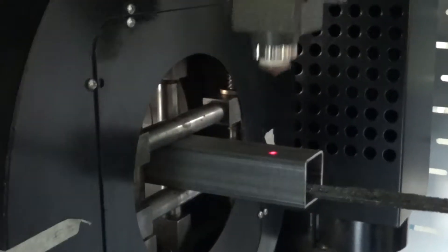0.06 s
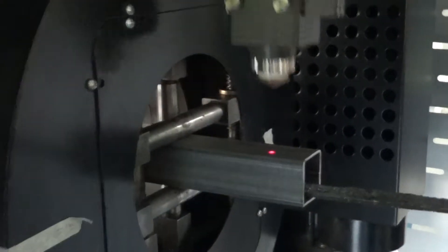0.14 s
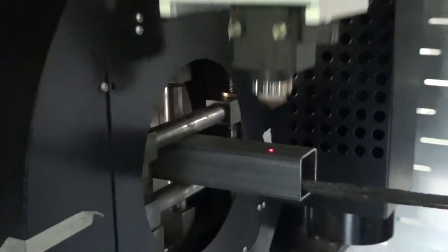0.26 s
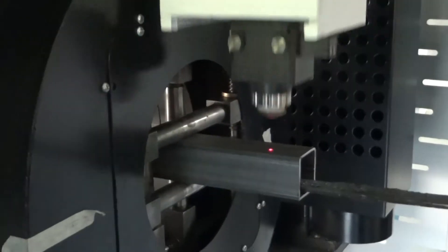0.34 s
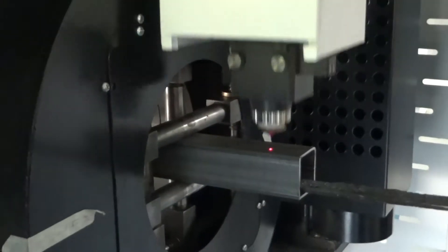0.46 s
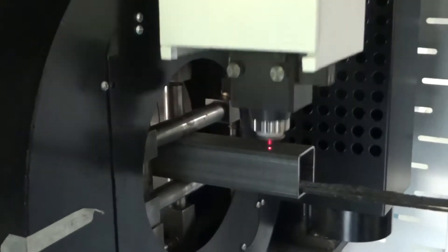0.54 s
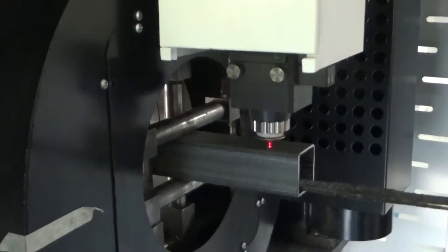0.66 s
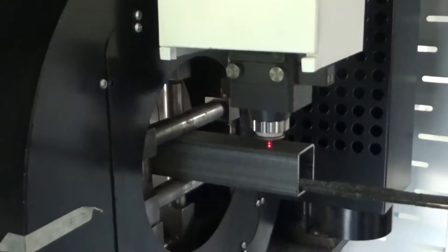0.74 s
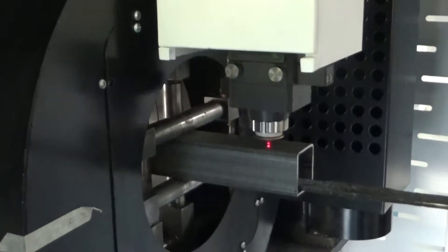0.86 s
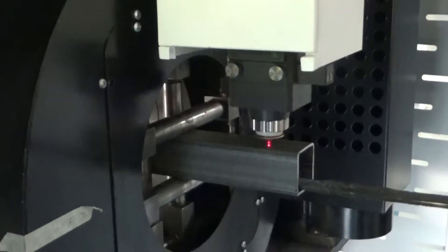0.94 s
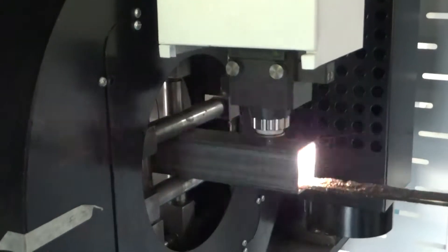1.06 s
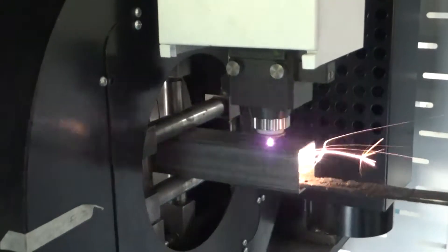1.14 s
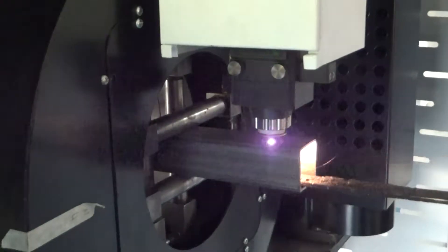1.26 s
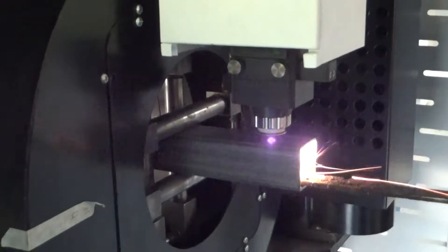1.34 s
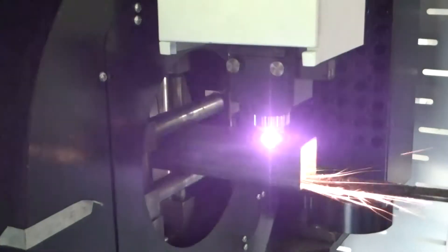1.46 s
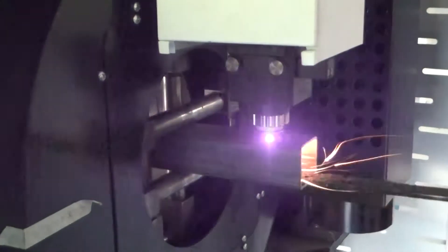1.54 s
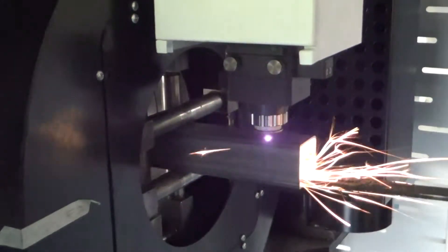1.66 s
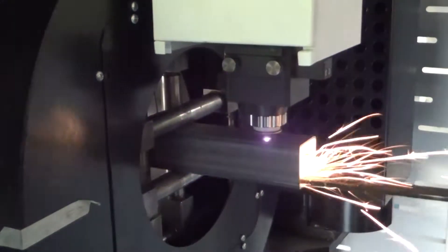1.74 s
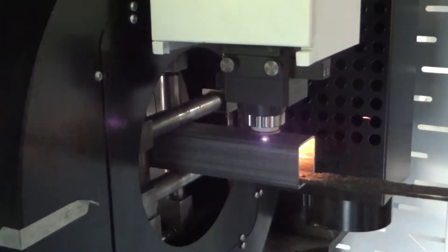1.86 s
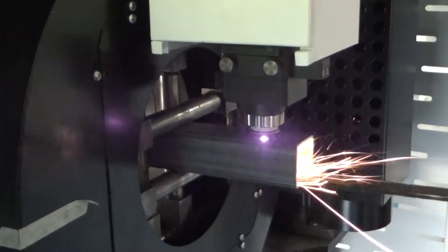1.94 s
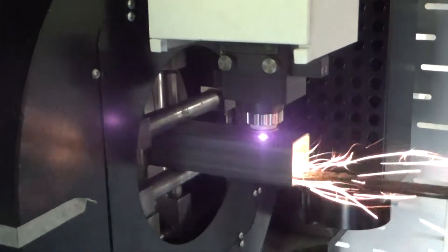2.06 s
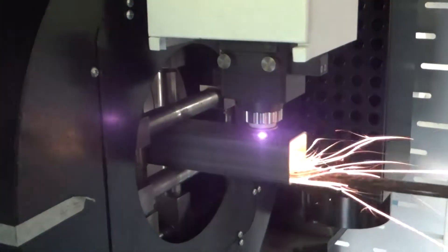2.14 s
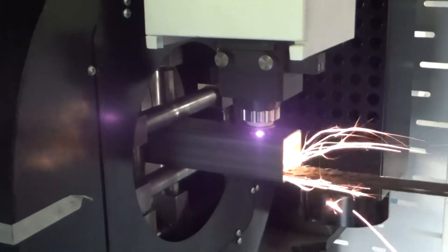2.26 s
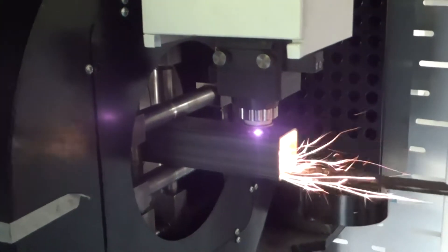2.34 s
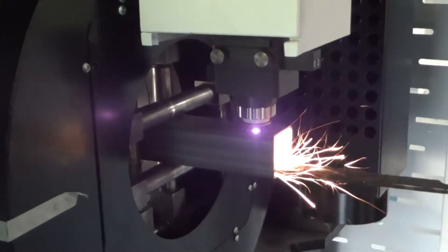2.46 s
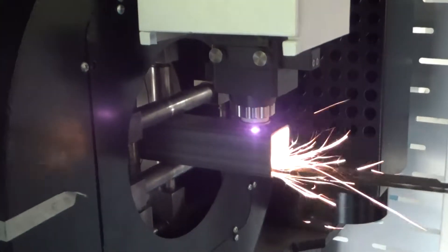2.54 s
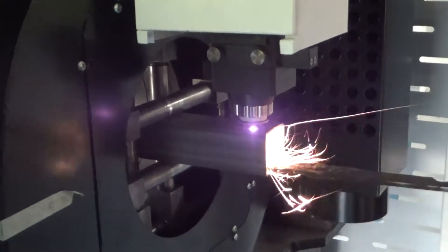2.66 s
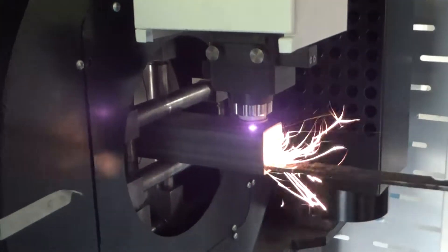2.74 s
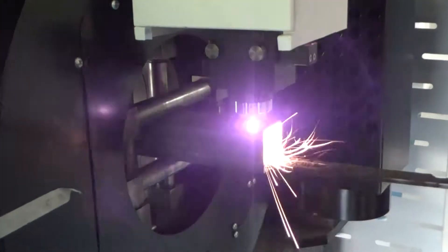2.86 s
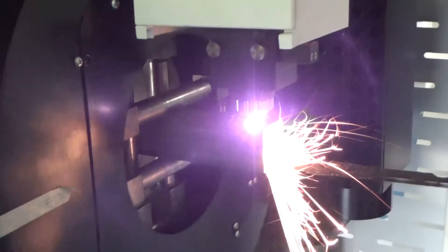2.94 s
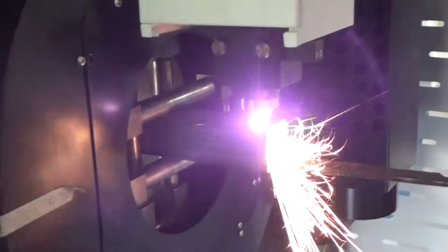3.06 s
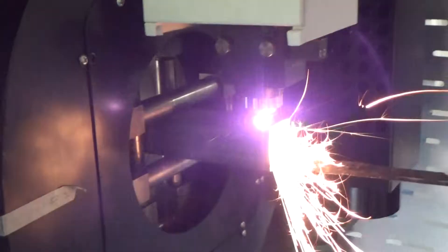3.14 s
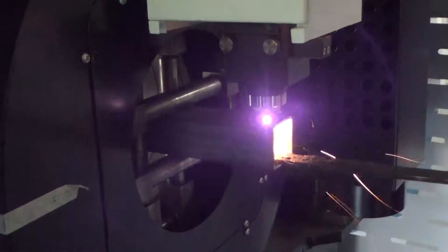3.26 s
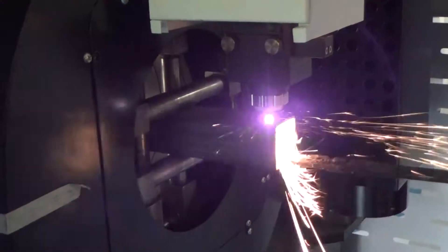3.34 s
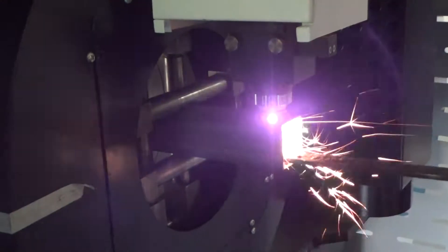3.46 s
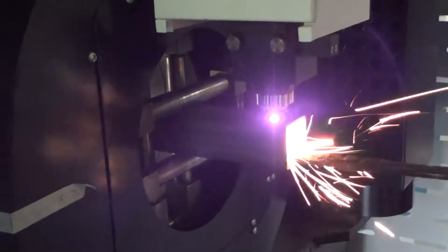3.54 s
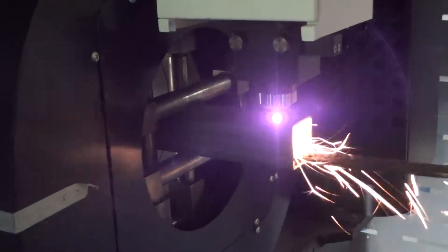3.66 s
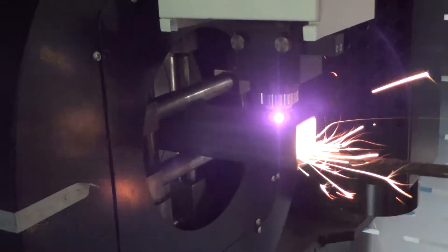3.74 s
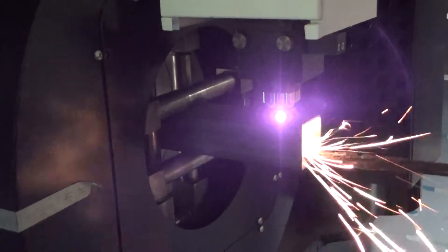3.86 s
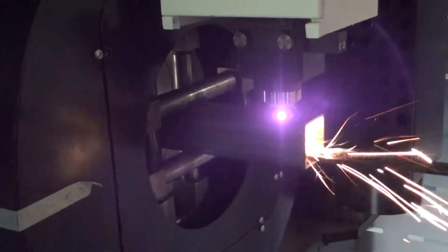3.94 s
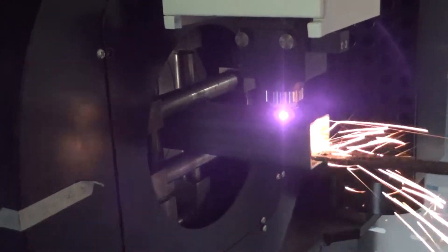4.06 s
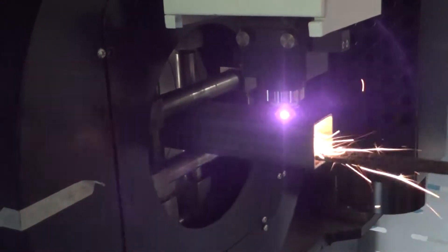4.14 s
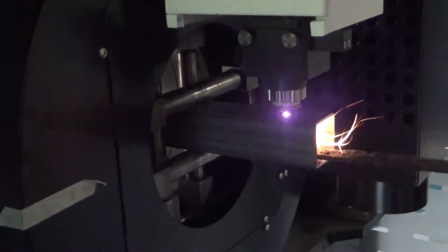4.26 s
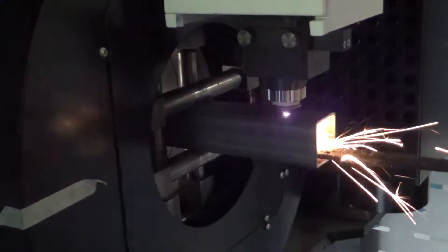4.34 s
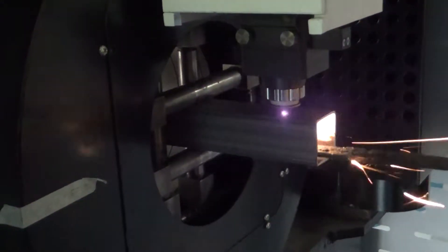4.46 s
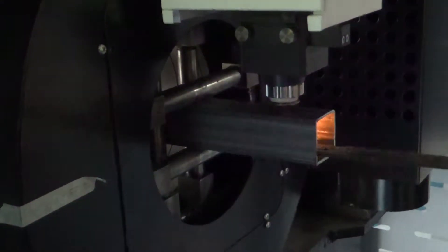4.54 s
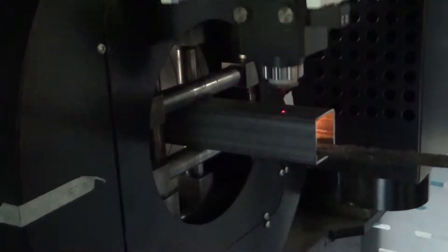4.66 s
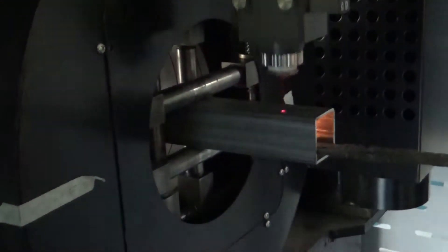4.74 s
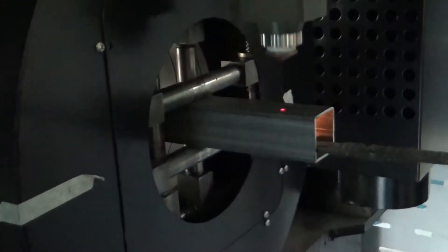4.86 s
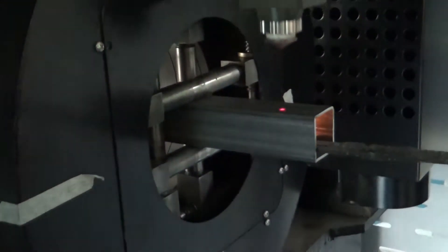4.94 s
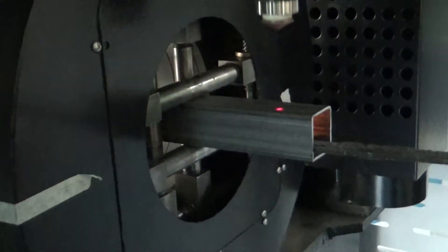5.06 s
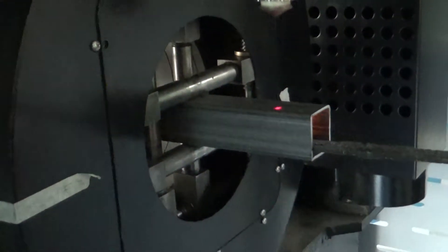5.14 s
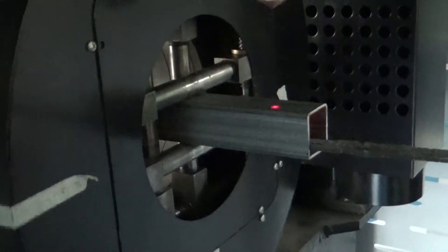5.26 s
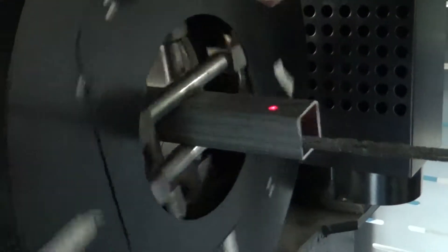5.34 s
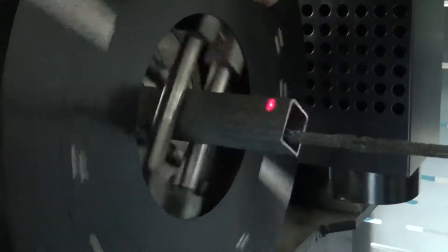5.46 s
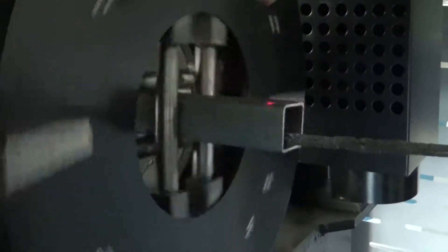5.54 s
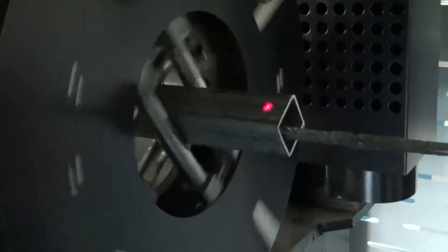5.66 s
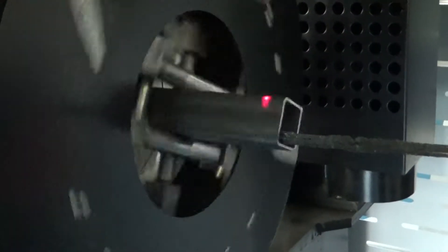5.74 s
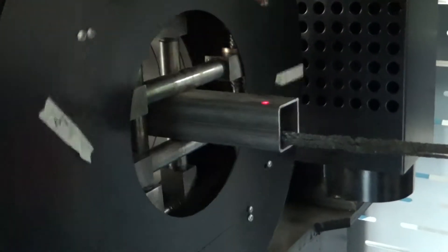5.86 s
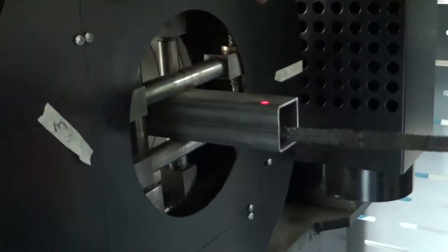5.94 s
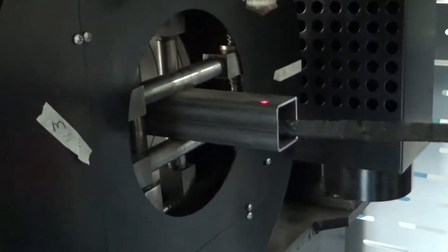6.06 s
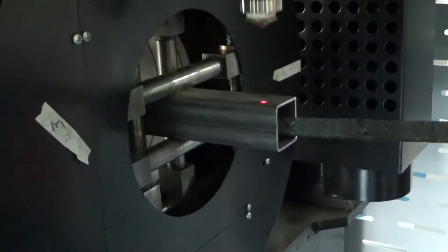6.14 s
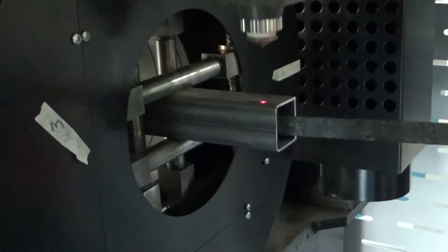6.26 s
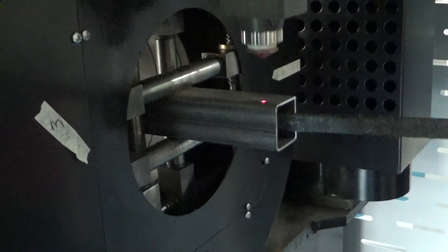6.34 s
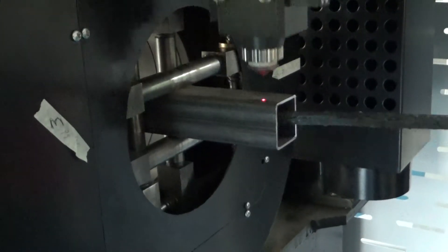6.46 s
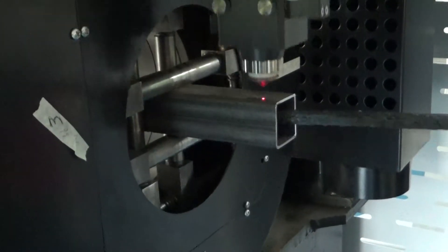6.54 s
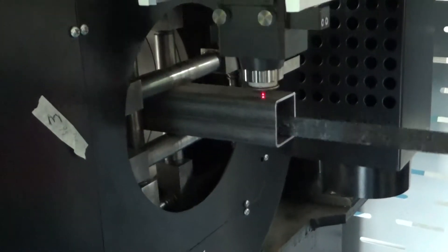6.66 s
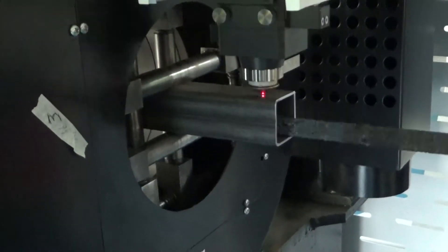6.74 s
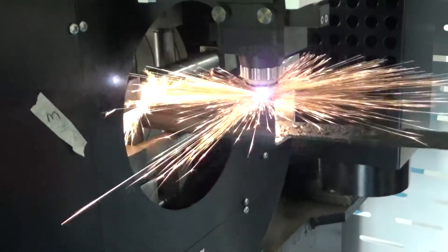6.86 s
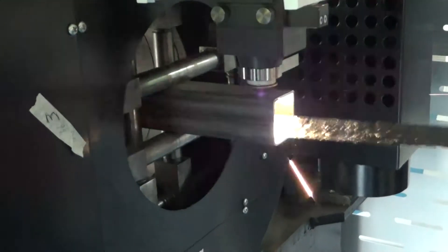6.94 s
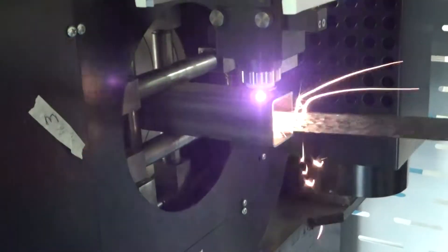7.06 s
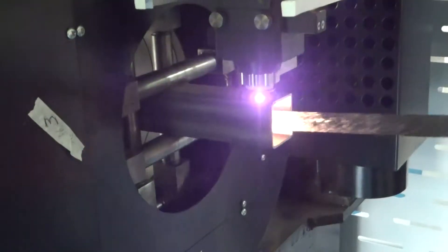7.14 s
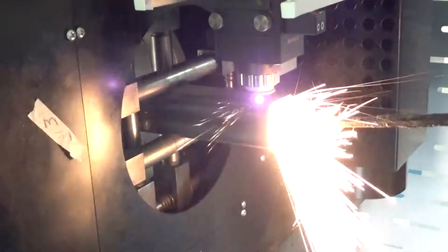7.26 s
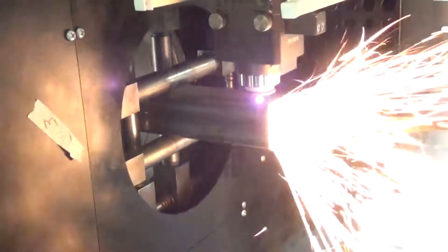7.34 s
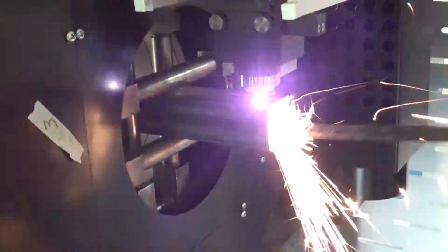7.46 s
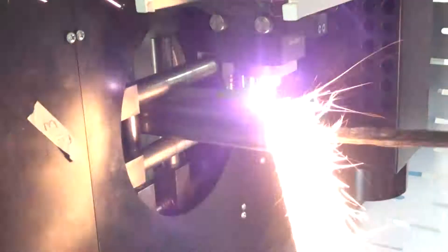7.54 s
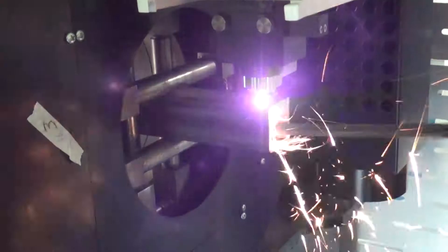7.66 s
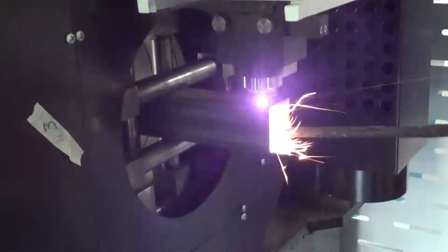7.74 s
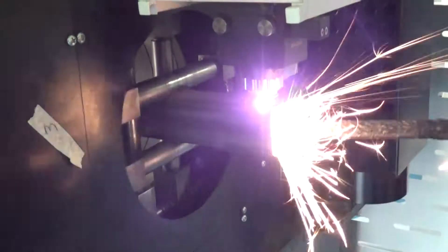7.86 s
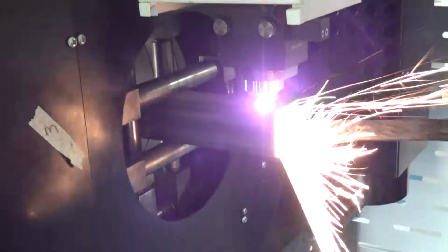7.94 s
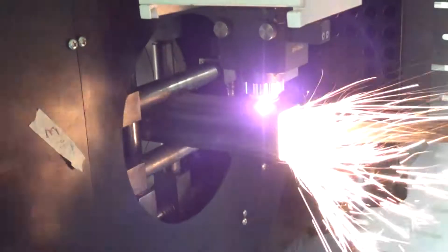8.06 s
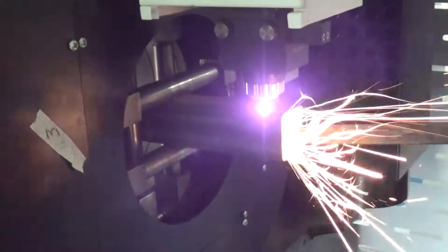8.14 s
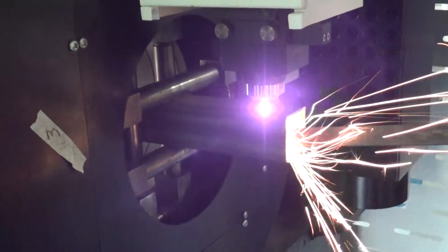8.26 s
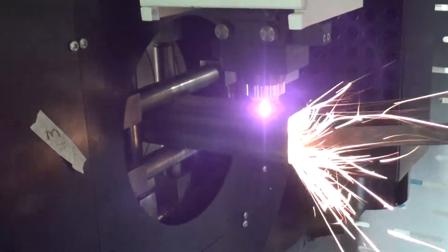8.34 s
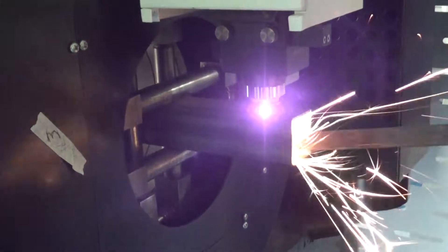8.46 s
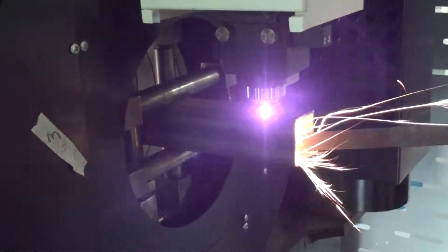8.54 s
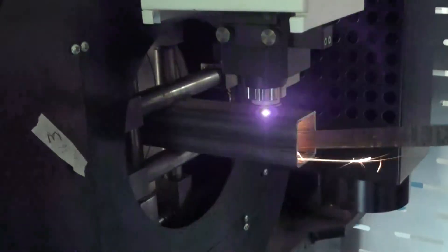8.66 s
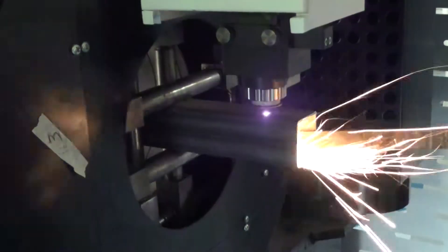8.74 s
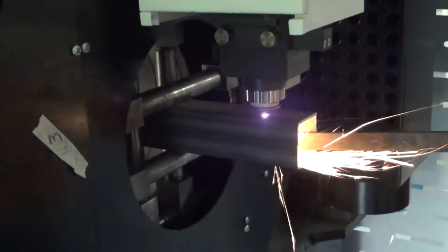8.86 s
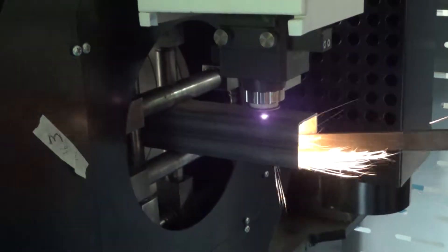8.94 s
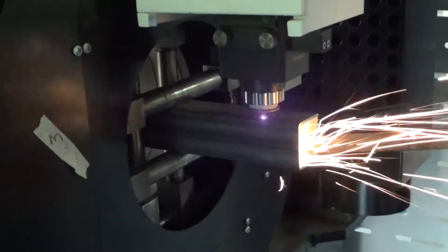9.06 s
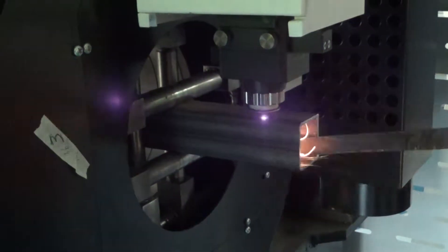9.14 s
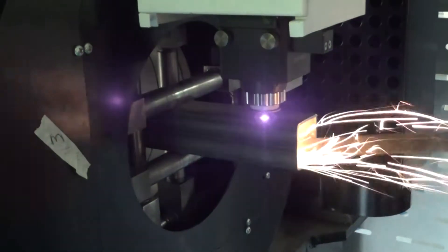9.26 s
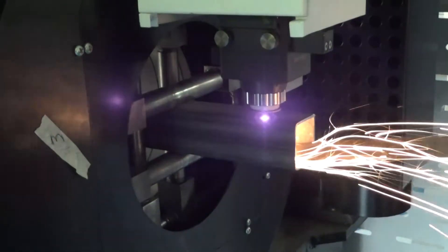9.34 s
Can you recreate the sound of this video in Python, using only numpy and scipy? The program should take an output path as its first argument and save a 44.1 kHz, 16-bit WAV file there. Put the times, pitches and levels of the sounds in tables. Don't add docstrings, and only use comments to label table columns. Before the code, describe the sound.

Factory rumble and air hiss, a knock, then a fierce sizzling gas blast, a brief pause with ringing metal clatter, and another blast.

```python
import sys
import numpy as np
from scipy import signal
from scipy.io import wavfile

SR = 44100
rng = np.random.default_rng(int(sys.argv[2]) if len(sys.argv) > 2 else 0)


def master(y):
    cut = np.clip(np.atleast_2d(y).T, -1, 1)
    pcm = np.round(cut * 32767)
    wavfile.write(sys.argv[1], SR, pcm.astype(np.int16))


def voltage_ratio(level):
    return 10 ** (np.asarray(level, float) / 20)


N = 414540
CLOCK = np.arange(N) / SR
TIME = np.arange(N // 40 + 2) * 40 / SR
PAUSE = slice(int(5.3 * SR), int(7.2 * SR))

# valve_opens_s, pressure_builds_s, valve_shuts_s, hiss_db, roar_in_tube_db (against the hiss)
CUTS = [
    (0.6655, .004, 4.677, -17, 2.5),
    (6.735, 0.019, 9.9, -17, 1.5),
]


def rms_one(x):
    return x / np.sqrt(np.mean(x ** 2) + 1e-20)


def fast(control, span=slice(None)):
    return np.interp(CLOCK[span], TIME, control)


def in_time(rows, off=None):
    s, *columns = np.transpose(rows)
    return np.array([np.interp(TIME, s, c, off, off) for c in columns])


def at_hz(points, hz):
    points = np.array(points)
    return np.interp(np.log(hz), np.log(points[:, 0]), points[:, 1])


def drift(rate):
    r = np.exp(-80 * np.pi * rate / SR)
    warm_up = 2000
    noise = rng.standard_normal(len(TIME) + warm_up)
    slow = signal.lfilter([1], [1, -2 * r, r * r], noise)[warm_up:]
    return rms_one(slow - slow.mean())


def spell(start, end, fade_db_per_s):
    return -fade_db_per_s * np.maximum(np.maximum(start - TIME, TIME - end), 0)


def ring(clicks, hz, t60):
    r, w = voltage_ratio(-60 / (t60 * SR)), 2 * np.pi * hz / SR
    return signal.lfilter([0, np.sin(w)], [1, -2 * r * np.cos(w), r * r], clicks + 1e-18)


def whistle(hz, width_hz):
    return rms_one(ring(rng.standard_normal(N), hz, np.log(1000) / (np.pi * width_hz)))


def band_pass(x, order, low_hz, high_hz):
    return signal.sosfilt(signal.butter(order, [low_hz, high_hz], "band", fs=SR, output="sos"), x)


def bands(edges, spectrum, side, moving_db, patchy_db, lean=((1, 0), (2, 0)), width=1, lead=((1, 0), (2, 0))):
    out, power, together = 0, 0, drift(20)
    white = rng.standard_normal((2, 2, N))
    for k, (low, high) in enumerate(zip(edges, edges[1:])):
        mid, wide = band_pass(white[k % 2], 2, low, high)
        hz = np.sqrt(low * high)
        tilt = np.tanh(at_hz(lean, hz) * np.log(10) / 40)
        turn = np.tan(at_hz(lead, hz) / 2)
        loose = np.sqrt(max(voltage_ratio(2 * at_hz(side, hz)) - tilt ** 2 - turn ** 2, 1e-4))
        ahead = np.gradient(mid) * SR / (2 * np.pi * hz)
        power += voltage_ratio(2 * at_hz(spectrum, hz)) * np.mean(mid ** 2)
        flicker_db = patchy_db * (together + 1.56 * drift(21))
        gain = fast(voltage_ratio(at_hz(spectrum, hz) + moving_db(hz) + flicker_db))
        sides = tilt * mid + turn * ahead + loose * wide
        out = out + gain * (mid + width * sides * [[1], [-1]])
    return out / np.sqrt(power)


def hall():
    # start_s, level_db
    gain_table = [(0.0, -24), (0.66, -23), (0.68, -38.5), (0.82, -48), (1.4, -52.5), (2.1, -48.5),
                  (2.85, -51.5), (3.0, -53), (4.15, -54.5), (4.5, -49.5), (4.73, -54), (5.0, -45),
                  (5.6, -42), (6.75, -39), (6.87, -51), (7.3, -48), (7.7, -53), (9.4, -47)]
    # pitch_hz, level_db (per Hz)
    rumble_colour = [(15, -42), (25, -22), (75, -13), (102, -8.5), (231, -1), (312, -4.5), (345, 3),
                     (421, -5.5), (466, 1), (629, -9), (724, -9), (1240, -10.5), (3000, -21.5), (3900, -50),
                     (6600, -120)]
    # pitch_hz, side_minus_mid_db
    hall_side = [(60, -13), (130, -9), (290, -6), (640, -6), (1410, -6), (3100, -8), (6820, -10),
                 (15000, -30)]
    # pitch_hz, left_minus_right_db
    hall_lean = [(60, -3.0), (180, -2.0), (550, -1.0), (1650, 1.0), (4970, 1.0), (15000, 0.5)]
    # pitch_hz, left_leads_by_radians
    hall_lead = [(25, .05), (60, .2), (125, 0.41), (340, 1), (1460, 0.68), (3000, 0.077)]
    # pitch_hz, width_hz, level_db (over the rumble)
    hums = [(49, 10, -17.5), (229, 4.4, -12), (346.3, 5.6, -11), (398, 6.1, -16), (472, 4.9, -13.5),
            (546, 27, -14), (716, 15, -15.5), (842, 22, -18), (950, 24, -22), (1043, 5.7, -17)]
    # pitch_hz, level_db (per Hz)
    air_colour = [(1500, 10), (2600, -11.5), (3150, 0.5), (4300, -8), (6500, -8), (8600, -1.5),
                  (10600, -8.5), (12300, -14), (15600, -24)]
    # pitch_hz, level_db (per Hz)
    purge_colour = [(880, -32), (1500, -5.5), (1750, -5), (2750, -8.5), (3730, -4), (4580, -8), (5470, -7),
                    (6590, -8.5), (8750, -5), (15600, -27.5)]
    # start_s, end_s, level_db
    far_air = [
        (0, 0.59, -21),
        (5.85, 6.104, -45),
        (6.1, 6.55, -47.5),
        (6.58, 6.72, -45),
    ]

    gain_db, = in_time(gain_table)
    width = fast(voltage_ratio(np.interp(gain_db, [-46, -34], [-9, 0])))
    rumble = bands(22 * 2 ** np.arange(0, 7.6, .5), rumble_colour, hall_side, lambda hz: 0, patchy_db=1.05,
                   lean=hall_lean, width=width, lead=hall_lead)

    fan_hz, fan_db, fan_stops_s = 81, -12, 4.6
    fan_db = fan_db + spell(CUTS[0][0], fan_stops_s, 60) * np.where(TIME < 1, .12, 1)
    fan_level = fast(voltage_ratio(fan_db + 0.85 * drift(3.5)))
    fan = fan_level * np.sin(2 * np.pi * fan_hz * CLOCK + fast(0.3 * drift(1.9)))
    rumble += fan * (1 - .17 * width * [[1], [-1]])

    for hz, width_hz, db in hums:
        hum = whistle(hz, width_hz)
        side = min(hz / 900, .4) * np.roll(hum, SR) - .14 * hum
        rumble += voltage_ratio(db) * (hum + width * side * [[1], [-1]])

    def purge_db(hz):
        return (TIME < 1) * (at_hz(purge_colour, hz) - at_hz(air_colour, hz))

    air = bands(1800 * 2 ** np.arange(0, 3.3, .3), air_colour, hall_side, purge_db, patchy_db=.4)
    air_db = np.max([db + spell(start, end, 80) for start, end, db in far_air], axis=0)
    return fast(voltage_ratio(gain_db + 3.0)) * rumble + fast(voltage_ratio(air_db + 1.17)) * air


def gliding_tones():
    # start_s, end_s, from_hz, to_hz, top_db
    glides = [(6.58, 6.7, 800, 840, -37), (6.71, 6.83, 718, 735, -35), (0.02, 0.42, 152, 140, -29),
              (6.57, 6.76, 3760, 3660, -48), (0.3, 1.2, 140, 135, -47), (5.47, 5.87, 190, 198, -38),
              (5.98, 6.4, 199, 195, -41), (5.99, 6.24, 3110, 3210, -49), (.2, .66, 530, 500, -29),
              (4.77, 4.97, 4820, 4280, -31), (4.78, 5.04, 3250, 3180, -31), (4.8, 5.0, 2880, 2700, -35)]
    top_at, swing_db = .4, 16
    out = np.zeros(N)
    for start, end, from_hz, to_hz, top_db in glides:
        done = (TIME - start) / (end - start)
        span = slice(int(start * SR), int(end * SR) + 80)
        hz = np.interp(done, [0, 1], [from_hz, to_hz]) * (1 + 0.00406 * drift(40.0))
        db = top_db - np.interp(done, [0, top_at, 1], [swing_db, 0, swing_db], 99, 99)
        phase = 2 * np.pi * np.cumsum(hz) * TIME[1]
        out[span] += fast(voltage_ratio(db + 2.0 * drift(19)), span) * np.sin(fast(phase, span))
    return out


def knocks():
    # start_s, peak_db, ring_hz, rattle_db, rattle_t60_s
    hits = [(0.544, -13, 7700, -30, .05), (0.6658, -11, 4900, -30, .03), (5.502, -34, 3150, -50, 0.046),
            (5.5217, -24, 5900, -27, 0.13), (5.771, -13.5, 3140, -36, 0.19), (5.778, -30, 9400, -27, 0.39),
            (5.805, -26, 6010, -42, 0.11), (6.049, -32, 8770, -38.5, 0.48), (6.2202, -36, 7850, -44, .1),
            (6.236, -41, 9000, -44, 0.07), (6.307, -34, 8000, -39, 0.06), (6.324, -37, 8000, -43, 0.16),
            (6.4712, -35, 8010, -46, .1), (6.4881, -31, 7770, -41, .15), (6.5884, -35, 8340, -42, 0.14),
            (6.6228, -35, 3730, -32, 0.06), (6.6444, -25, 7650, -41, .3), (6.648, -29, 10800, -49, 0.3),
            (6.7, -35, 8900, -37, 0.4), (6.7225, -27, 5000, -36, .1), (6.7325, -18, 9600, -25, 0.037),
            (6.752, -40, 3400, -35, .12)]
    # pitch_hz, level_db, t60_s
    tray = [(1222, 8, 0.22), (1440, -23, 5.0), (2040, -7, 5.0), (2330, -16, 0.18), (2550, -17, 0.19),
            (3060, -3, 2.3), (4330, -22, 5.0), (5040, -11, 0.3), (5630, -23, 5.0), (6000, -25, 3.5),
            (6008, -16, 5.0), (6640, -15, 5.0), (6960, 4, 0.51), (8150, 2, 0.32), (8100, -2, 0.16),
            (8900, -1, 0.16), (9000, -12, 0.46), (9700, -10, 0.12), (10080, -19, 0.14), (10100, -27, 0.6),
            (10300, -22, 0.16), (10800, -35, 2.2)]
    out, rattle = np.zeros(N), np.zeros(N)
    grit = rng.standard_normal(N) * voltage_ratio(2.0 * fast(drift(150)))
    half = SR // 2
    click, age = np.r_[1, np.zeros(half - 1)], np.arange(half) / SR
    parts = ring(click, 4000, 0.0028) - ring(click, 5000, 0.0039)
    parts += ring(click, 7360, 0.012) - ring(click, 9000, 0.011)
    parts += .4 * ring(click, 11000, .004) - .15 * ring(click, 13500, .003)
    crack = band_pass(parts, 3, 2600, 15000) * 0.73
    for s, peak_db, hz, rattle_db, t60 in hits:
        i = int(s * SR)
        ringing = ring(ring(click, hz, 0.0024), hz, 0.28)
        out[i:i + half] += voltage_ratio(peak_db) * crack + voltage_ratio(-48 + 0.58 * peak_db) * ringing
        rattle[i:i + half] += voltage_ratio(rattle_db - 60 * age / t60) * np.minimum(age / 0.0051, 1)
    bright = rms_one(band_pass(grit, 6, 1800, 10400))
    shaking = (rattle * grit)[PAUSE]
    for hz, db, t60 in tray:
        out[PAUSE] += voltage_ratio(db / 2 - 36.5) * ring(shaking, hz, min(t60, .3) * 0.25)
    return out + 0.69 * rattle * bright


def pings():
    # start_s, level_db, pitch_hz, t60_s
    contacts = [(5.502, -39, 3080, .08), (5.5215, -26, 4700, .02), (5.5215, -32, 5300, .02),
                (5.5355, -35, 5000, .04), (5.545, -33, 4900, .04), (5.7712, -13.5, 4780, 0.02),
                (5.7712, -18, 6400, .01), (5.7712, -18, 3600, .015), (5.776, -32, 1980, .1),
                (5.841, -35, 4030, .1), (5.845, -34, 6960, .08), (5.85, -43, 3160, 0.17),
                (5.782, -38, 4780, .08), (5.786, -25, 8940, .04), (5.787, -30, 7900, .04),
                (5.789, -29, 6960, .07), (5.794, -27, 4730, .06), (5.795, -30, 8940, .04),
                (5.80, -30, 6960, .05), (5.802, -32, 5660, .06), (5.802, -29, 8940, .05),
                (5.803, -27, 4030, .06), (5.808, -34, 10250, .04), (5.815, -32, 4020, .07),
                (5.821, -40, 10100, .05), (5.824, -27, 6960, .07), (5.835, -36, 5640, .05),
                (5.778, -29, 2580, 0.32), (5.79, -33, 2450, 0.22), (5.83, -36, 3190, 0.27),
                (5.86, -46, 4720, 0.27), (5.866, -22, 8900, .02), (5.8655, -34, 4500, .01),
                (6.221, -39, 9900, 0.043), (6.222, -40, 8700, .05), (6.325, -42, 10000, .15),
                (6.651, -28, 7900, 0.18), (6.662, -39, 8900, .3), (6.65, -35, 10250, 0.22),
                (6.692, -42, 3630, .1), (6.70, -38, 4800, .1), (6.732, -10, 9500, .02),
                (6.7325, -30, 13000, .02), (6.647, -38, 13000, .03), (6.624, -34, 10300, .03),
                (6.734, -30, 4940, .03), (6.754, -30, 3000, .05)]
    out, click = np.zeros(N), np.r_[1, np.zeros(SR // 4)]
    for s, db, hz, t60 in contacts:
        i = int(s * SR)
        tone = ring(ring(click, hz, 0.0023), hz, t60)
        out[i:i + len(click)] += voltage_ratio(db - 5.0) * tone / np.max(tone)
    return out * fast(voltage_ratio(2.3 * drift(90)))


def slug():
    # start_s, peak_db, high_tones_db, low_tones_db
    bounces = [
        (5.362, -28, -0.5, -17),
        (5.421, -18, 3, -6),
        (5.655, -29, -5, -12),
        (5.6815, -25, 2, -4),
        (5.8665, -23.5, 7, -4),
        (5.9294, -24, -12, -15),
        (5.9548, -26, -10, -21),
        (5.964, -24, -9, -22),
        (6.0093, -25, -6, -18),
    ]
    # pitch_hz, level_db, t60_s
    tones = [(11470, 1.5, 0.063), (11500, -7, 0.12), (14490, -26, 0.27), (14500, -14, .3), (13150, -24, .2),
             (7800, -6, 0.33), (6260, -4, .3), (6230, -7, 0.39)]
    s, peak_db, high_db, low_db = np.transpose(bounces)
    at, out, ticks = (s * SR).astype(int), np.zeros(N), np.zeros(N)
    for hz, db, t60 in tones:
        high = hz > 9999
        rise_s = .006 if high else .05
        clicks = np.zeros(N)
        clicks[at] = voltage_ratio(peak_db + db - 35.0 + (high_db if high else low_db))
        push = ring(clicks[PAUSE] * 0.0056 / rise_s, hz, rise_s)
        out[PAUSE] += ring(push, hz, t60) * fast(voltage_ratio(4.5 * drift(21)))[PAUSE]
    for i, db in zip(at, peak_db):
        ticks[i:i + 400] += voltage_ratio(db + 1.5 - 60 * np.arange(400) / SR / 0.031)
    return out + band_pass(ticks * rng.standard_normal(N), 7, 7300, 11900)


def glints():
    # start_s, end_s, pitch_hz, level_db (rms)
    held_tones = [(5.361, 5.385, 11466, -37), (5.387, 5.398, 11466, -38), (5.424, 5.452, 11466, -34),
                  (5.653, 5.668, 11466, -45), (5.684, 5.701, 11466, -40), (5.712, 5.745, 11460, -48),
                  (5.915, 5.95, 11455, -48), (5.952, 5.996, 11450, -45), (6.015, 6.04, 11450, -55),
                  (5.866, 5.886, 14495, -48), (5.94, 6.04, 14492, -60), (5.866, 5.89, 12500, -54),
                  (5.89, 5.95, 13150, -62), (5.885, 5.94, 7800, -43), (5.94, 5.98, 7800, -48),
                  (5.687, 5.732, 6240, -54), (5.92, 5.978, 6240, -52), (5.52, 5.571, 2985, -37),
                  (6.309, 6.336, 3130, -48), (5.773, 5.80, 4780, -37), (5.80, 5.9, 4780, -53),
                  (5.84, 5.92, 4030, -55), (5.802, 5.812, 5650, -39), (5.815, 5.845, 5620, -46),
                  (5.79, 5.83, 10250, -46), (5.815, 5.835, 3700, -46), (5.775, 5.82, 1300, -42),
                  (5.74, 5.775, 3150, -51), (6.645, 6.67, 8800, -50), (.543, .548, 7650, -27),
                  (.543, .547, 4500, -32), (.543, .547, 3650, -32), (.543, .547, 10300, -32),
                  (6.755, 6.759, 3150, -35), (6.768, 6.774, 3750, -34), (6.773, 6.778, 3000, -37),
                  (6.784, 6.793, 2950, -39)]
    out, waver_db = np.zeros(N), 2.0 * drift(45)
    for start, end, hz, db in held_tones:
        span = slice(int((start - .015) * SR), int((end + .015) * SR))
        level = fast(voltage_ratio(db + waver_db + spell(start, end, 3000)), span)
        out[span] += level * np.sqrt(2) * np.sin(2 * np.pi * hz * CLOCK[span])
    return out


def echoes(x):
    lags = (rng.uniform(0.0043, 0.07, (2, 8)) * SR).astype(int)
    return np.array([sum(voltage_ratio(-700 * d / SR) * np.roll(x, d) * (-1) ** d for d in side) for side in lags])


def spits():
    # start_s, peak_db
    drops = [(2.7806, -23), (3.2166, -21), (3.5922, -22), (6.9107, -26), (7.8456, -18), (8.0506, -19),
             (9.1157, -17)]
    hz, t60 = 2900, .012
    s, db = np.transpose(drops)
    clicks = np.zeros(N)
    clicks[(s * SR).astype(int)] = voltage_ratio(db - 8)
    return ring(clicks, hz, t60) - 0.55 * ring(clicks, 0.62 * hz, .6 * t60)


def tube():
    # start_s, end_s, level_db
    hum_spells = [(.93, 1.62, -53.5), (1.92, 3.05, -50.5), (3.48, 4.0, -54), (4.0, 4.52, -50.5),
                  (7.08, 7.6, -52.5), (7.6, 8.2, -57), (8.2, 8.62, -50.5), (8.95, 9.45, -50)]
    level_db = np.max([db + spell(start, end, 83) for start, end, db in hum_spells], axis=0)
    level_db = level_db + 3.4 * drift(24)
    hz = 569 + 6.6 * drift(28)
    return fast(voltage_ratio(level_db)) * np.sqrt(2) * np.sin(2 * np.pi * np.cumsum(fast(hz)) / SR)


def beam():
    # start_s, end_s, level_db, duty (on-time share 0-1)
    passes = [(1.38, 1.75, -50, .47), (1.9, 2.78, -41, .49), (2.88, 3.17, -41, .41), (3.3, 3.52, -47, .33),
              (3.55, 3.88, -43, .44), (3.95, 4.42, -51, .43), (6.95, 7.3, -47, .49), (7.45, 7.62, -44, .44),
              (7.8, 7.98, -43, .27), (8.08, 8.55, -42, .46), (8.68, 8.95, -48, .49), (9.0, 9.2, -48, .4),
              (9.25, 9.45, -38, .35)]
    # multiple (of the pulse rate), level_db
    reach = [
        (1, -1.5),
        (2, 22),
        (3, 8),
    ]
    pulse_hz = 5000.3
    levels = [(voltage_ratio(db + spell(start, end, 140)), duty) for start, end, db, duty in passes]
    out = np.zeros(N)
    for multiple, db in reach:
        k = round(multiple)
        strength = sum(gain * abs(np.sin(np.pi * k * duty)) for gain, duty in levels) / k
        level = fast(strength * voltage_ratio(db + 2.5 * drift(19)))
        out += level * np.sqrt(2) * np.sin(k * 2 * np.pi * pulse_hz * CLOCK + fast(0.3 * drift(4.9)))
    return out


def jet():
    # start_s, loudest_pitch_hz, focus_db, spray_db (how open the cut is)
    gap = [(0.7, 9900, -2, -4), (0.85, 9700, -1.5, 1.5), (1.12, 9700, -1, 0), (1.25, 9700, 0.5, -3),
           (1.6, 9600, -0.5, -2.5), (2, 9940, 0, -0.5), (2.6, 9560, -0.5, -0.2), (2.85, 9530, 0, -1.5),
           (3.05, 9260, 1, -2), (3.32, 9000, 2, -4), (3.45, 9500, 0.5, -2), (3.95, 9600, 1, -.5),
           (4.25, 9560, .7, -1.5), (4.4, 9500, 0.5, -0.6), (4.62, 9540, 0.5, 0.5), (4.75, 9400, 0, -2.5),
           (4.96, 9500, -.7, 3.5), (5.11, 9550, -1, 1), (5.22, 9600, -1, -4.5), (5.5, 9500, -1.5, -3),
           (6.77, 9700, -0.5, 1), (6.9, 9500, -0.5, -0.5), (7.2, 9560, 0, -0.5), (7.78, 9400, 0.5, -1.5),
           (7.92, 9440, 0, 2), (8.25, 9500, .7, 2.5), (8.4, 9560, 1, 1.5), (8.95, 9700, 1, 1),
           (9.12, 9750, .3, 4.5), (9.24, 9780, 1, 1), (9.4, 9700, -1, 2.5)]
    # pitch_hz, level_db (per Hz)
    hiss_colour = [(380, -38), (650, -23.5), (826, -28), (1440, -23), (1720, -23), (3120, -15), (3660, -15),
                   (4840, -13), (6000, -11.5), (6900, -7), (7700, -3.5), (8600, -0.5), (9670, 2),
                   (10900, -3), (11700, -6.5), (12500, -8), (14300, -11), (15600, -16)]
    # pitch_hz, side_minus_mid_db
    hiss_side = [(60, -31), (150, -22), (380, -15), (950, -10), (2380, -12.5), (5980, -12), (8000, -14.5),
                 (10000, -20), (15000, -22.5)]
    # start_s, centre_hz, boost_db
    vent = [
        (4.72, 6500, 0),
        (4.79, 5000, 2.5),
        (4.84, 3300, 4.5),
        (4.9, 1900, 5.5),
        (4.98, 1100, 8),
        (5.13, 750, 11),
        (5.22, 800, 6.5),
        (5.45, 850, 8),
        (6.2, 850, 0),
    ]
    # pitch_hz, width_hz, level_db (against the hiss)
    cavities = [(3150, 260, -28), (12500, 540, -26), (2280, 120, -46), (1750, 150, -50), (10580, 460, -16),
                (6010, 440, -23)]

    cut = (TIME >= CUTS[1][0]).astype(int)
    opens, builds, shuts, hiss_db, roar = np.transpose(CUTS)[:, cut]
    lost_db = 21 * np.maximum(TIME - shuts, 0) ** 2.02
    build_db = 20 * np.log10(np.clip((TIME - opens) / builds, 1e-5, 1))
    hiss_db = hiss_db - lost_db + build_db
    centre_hz, focus_db, kerf_db = in_time(gap)
    linger_db = np.minimum(lost_db, 27)
    flutter_db = 0.62
    roar = roar + 0.56 * kerf_db + 1.07 * linger_db + 2 * flutter_db * drift(1.7)
    spray = kerf_db + 0.49 * linger_db + flutter_db * drift(14.0)
    sizzle = 0.22 * kerf_db + flutter_db * drift(2.6)
    vent_hz, vent_db = in_time(vent)
    places = np.log([1100, 3300, 6500, 11500, 13500])

    def moving_db(hz):
        share = [np.interp(np.log(hz), places, row) for row in np.eye(5)]
        place = np.log(hz / 9600) / 0.077
        lean_db = 40 * np.log(centre_hz / 9600) * np.clip(place, -1, 1) + focus_db * (1 - min(place ** 2, 2))
        distance = np.log(hz / vent_hz) / np.where(hz > vent_hz, .9, .95)
        swell_db = vent_db * np.exp(-distance ** 2) * min(6000 / hz, 1) ** 4
        parts_db = share[0] * roar + share[1] * spray + share[4] * sizzle
        return parts_db + lean_db * (share[2] + share[3]) + swell_db

    edges = np.r_[560 * 2 ** np.arange(0, 3.5, .39), np.arange(6400, 16500, 800)]
    left_right_db = [(500, -.3), (1500, .6), (4000, -0.43), (9000, -0.56)]
    hiss = bands(edges, hiss_colour, hiss_side, moving_db, patchy_db=0.4, lean=left_right_db)
    hollow = sum(voltage_ratio(db) * whistle(hz, width) for hz, width, db in cavities) * fast(voltage_ratio(spray))
    return fast(voltage_ratio(hiss_db + 1.5)) * (hiss + hollow)


def mirrored(x):
    # delay_s, level_db
    mirrors = [(.0043, -21), (.0079, -20), (.0137, -21), (.0223, -22), (.0347, -23)]
    back = 0
    for k, (s, db) in enumerate(mirrors):
        late = np.pad(x, ((0, 0), (int(s * SR), 0)))[:, :N]
        back = back + (-1) ** k * voltage_ratio(db) * late
    return (x + back) / np.sqrt(1 + sum(voltage_ratio(2 * db) for s, db in mirrors))


def scene():
    metal = slug() + knocks() + pings()
    loose_metal = metal + voltage_ratio(-4.5) * echoes(metal) + glints()
    return hall() + gliding_tones() + loose_metal + spits() + tube() + beam() + mirrored(jet())


def roll_off(x):
    return signal.sosfilt(signal.butter(12, 15860, fs=SR, output="sos"), x)


def record(dry):
    limited = .8 * np.tanh(dry / .8)
    mix = signal.sosfilt(signal.ellip(14, .5, 80, 15760, fs=SR, output="sos"), limited)
    return roll_off(mix)


dry = scene()
out = record(dry)
master(out)
```